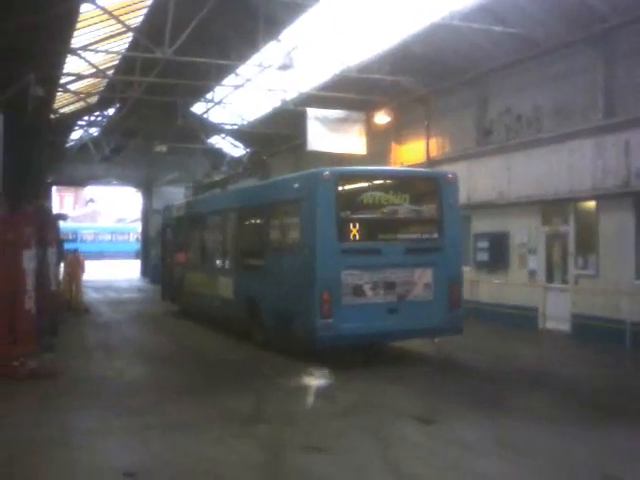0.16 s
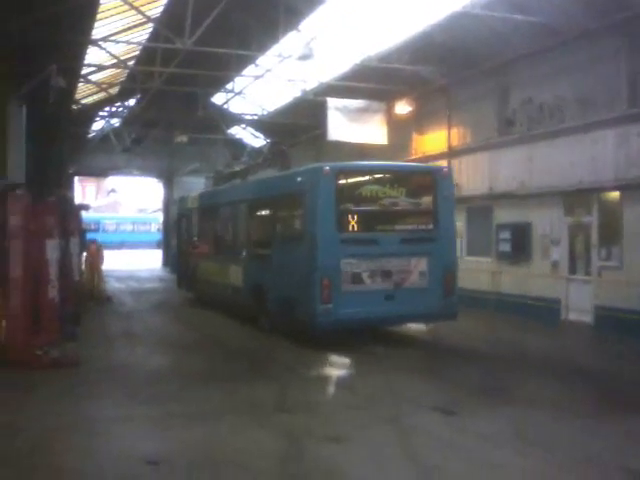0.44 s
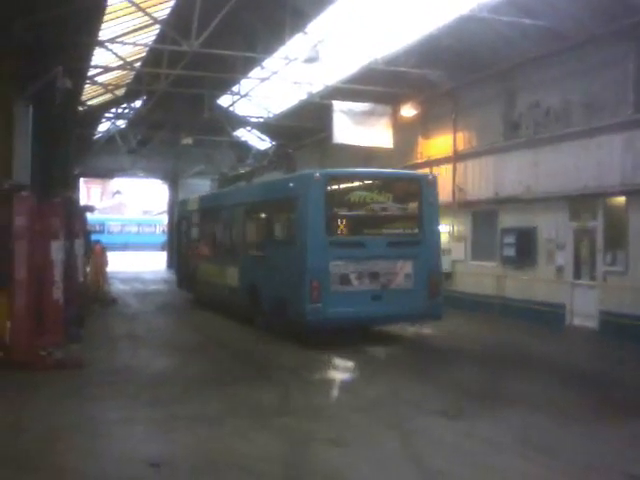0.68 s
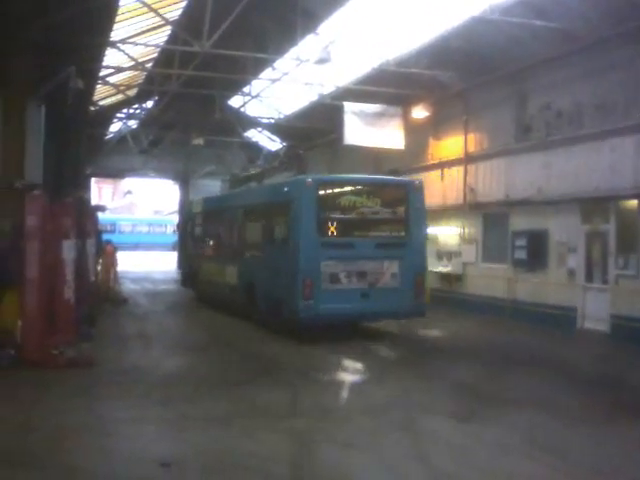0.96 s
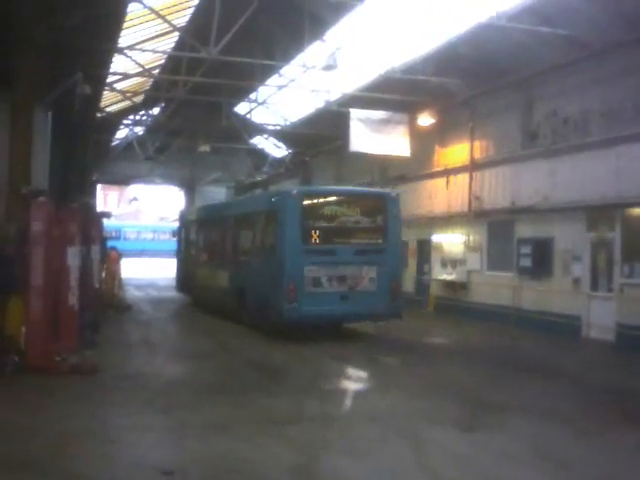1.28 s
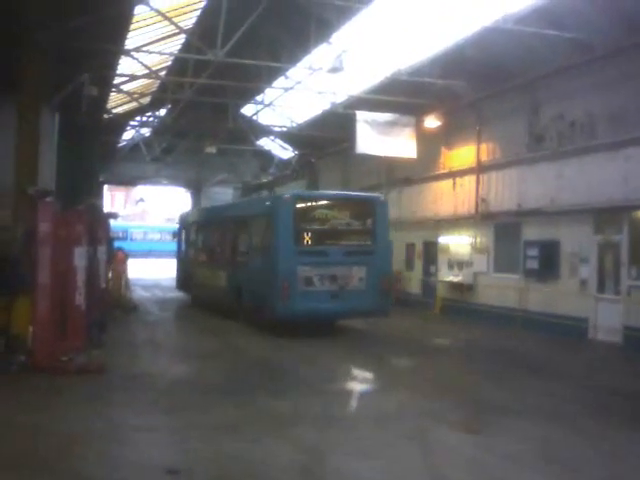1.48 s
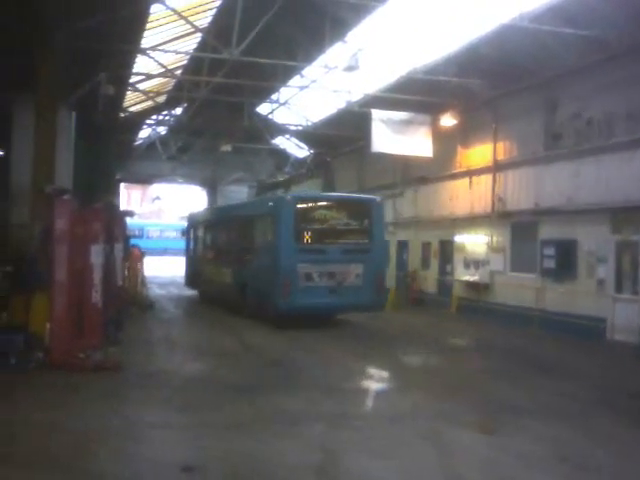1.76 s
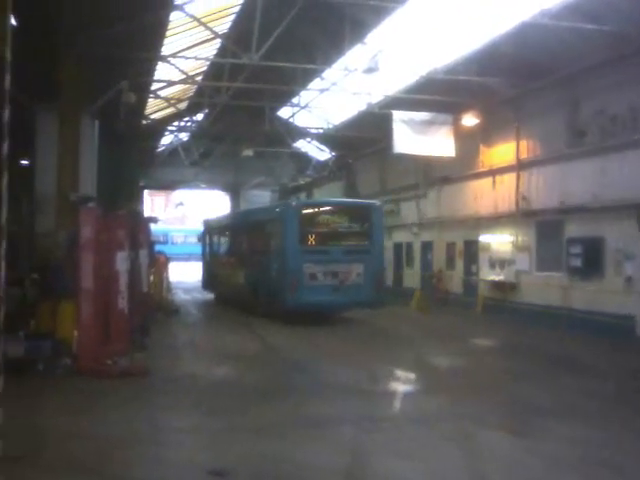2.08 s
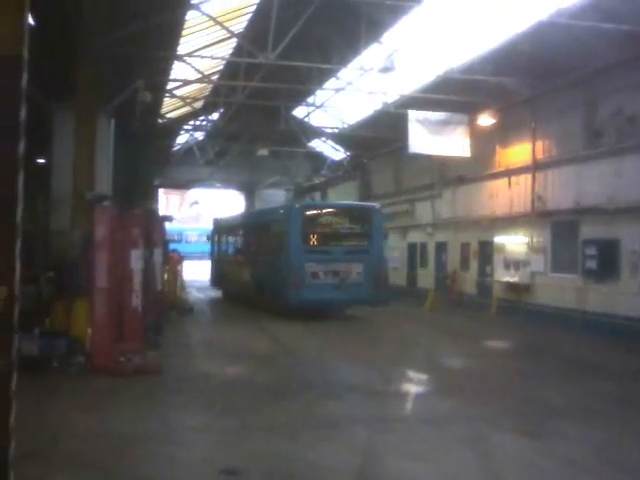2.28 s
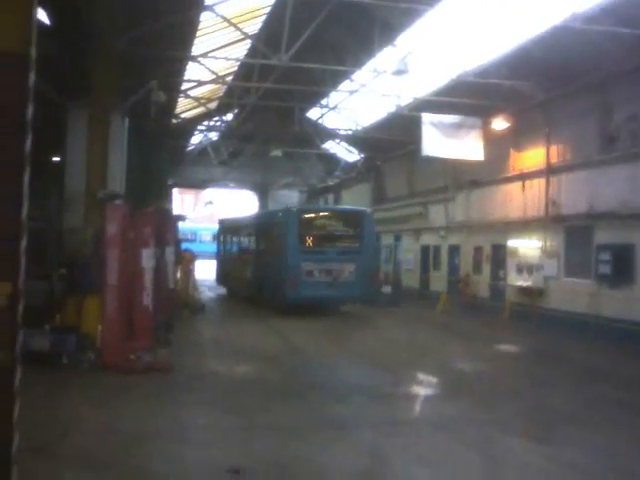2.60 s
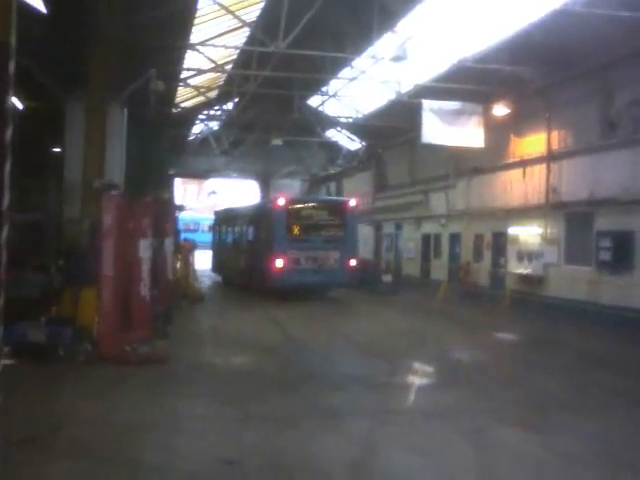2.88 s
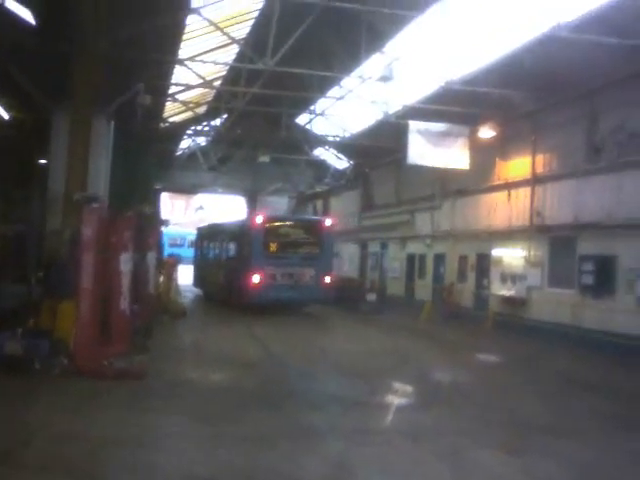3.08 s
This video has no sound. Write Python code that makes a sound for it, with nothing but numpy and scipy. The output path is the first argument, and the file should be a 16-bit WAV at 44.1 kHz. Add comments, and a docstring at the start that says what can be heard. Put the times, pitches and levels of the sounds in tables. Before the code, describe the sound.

A diesel bus engine, already running, roars and clatters in a reverberant depot. Its pitch climbs steadily from 0 to 1.8 s, with a low exhaust boom swelling near 1.35 s and faint gear whines around 1, 1.6 and 2 s. It peaks and changes up at 1.8 s, pitch sagging until 2.5 s, then levels and fades to 3.25 s over steady low hum. Gritty, low-quality camera sound.

```python
"""In a big, echoing depot a diesel bus pulls away: the engine climbs, changes up near 1.8 s and fades with distance.
A low hum and dull hall noise stay steady behind it, and gear whines come and go as narrow gliding tones.
The exhaust is tones tied to the firing rate over rumbling noise; the engine is noise bursts, one per firing,
mixed with fan rush and coloured by the block and its covers. The noise parts blur in the hall's echo.
A small camera samples it all at a low rate and holds each sample, which adds a gritty sheen."""
import sys
import numpy as np
from scipy import signal
from scipy.fft import rfft, irfft, next_fast_len
from scipy.io import wavfile
from scipy.ndimage import map_coordinates

SR = 44100
rng = np.random.default_rng(int(sys.argv[2]) if len(sys.argv) > 2 else 0)


def put_to_file(sound):
    """Save the sound as 16-bit audio at rate SR, in the file named by the first command-line argument."""
    columns = np.atleast_2d(sound).T  # one column per channel
    safe = np.clip(columns, -1, 1)
    whole_steps = np.round(safe * 32767)
    wavfile.write(sys.argv[1], SR, whole_steps.astype(np.int16))


N = 143325
T = np.arange(-SR, N) / SR  # time in s; the engine is already running a second earlier

# Engine speed: t/s, firing rate/Hz
FIRING_RATE = [(0, 65), (.5, 69.3), (1, 74), (1.45, 78), (1.8, 80), (2.1, 75.5), (2.5, 69), (2.9, 70.5),
               (3.25, 70.7)]
# Level of the engine block, before a small fixed lift: t/s, level/dB
BLOCK_LEVEL = [(0, -18), (.6, -17), (1.15, -17), (1.5, -18), (1.82, -15.5), (2.12, -20), (2.42, -18.5),
               (2.65, -22), (2.95, -24), (3.25, -25)]
# Level of the clatter from the covers, before a small wobble: t/s, level/dB
COVERS_LEVEL = [(0, -19.5), (.9, -19.5), (1.65, -17), (1.95, -19.5), (2.35, -21), (2.6, -25), (3.25, -28)]
# Level of the exhaust rumble: t/s, level/dB
RUMBLE_LEVEL = [(0, -25), (.5, -24.5), (1.1, -23), (1.8, -21.5), (2.15, -25), (2.45, -26), (2.8, -34.5),
                (3.25, -37)]
# Level of the firing note: t/s, level/dB
FIRING_LEVEL = [(0, -35), (.35, -36), (.9, -38), (1.35, -38), (1.55, -51), (2.4, -60), (3.25, -50)]
# Level of its octave, which booms as it passes 155 Hz, before a small wobble: t/s, level/dB
BOOM_LEVEL = [(0, -33.5), (.6, -38), (.9, -38), (1.05, -31.5), (1.35, -25.5), (1.55, -63.5), (2.1, -34),
              (2.6, -44), (3.25, -45)]
# Higher exhaust tones, before pipe, flutter and rumble level: multiple of the firing rate, level/dB
EXHAUST_ORDERS = [(1.5, -15), (2.5, -17), (3, -13), (3.5, -8.5), (4, -11), (4.5, -11.5), (5, -9), (5.5, -5),
                  (6, -4.5)]
# Whining tones of the block, against the block and before flutter: multiple of the firing rate, level/dB
WHINING_ORDERS = [(11.5, -24.5), (12, -19.5), (13, -15.5)]
# Colour of the exhaust pipe: f/Hz, level/dB
PIPE_COLOUR = [(20, -45), (58, -38), (82, -7), (105, -7), (165, 0), (205, -7.5), (245, -6), (305, 3.5),
               (345, -0.5), (420, -8), (520, -10), (800, -23.5), (2000, -78)]
# Colour of the engine block: f/Hz, level/dB
BLOCK_COLOUR = [(60, -60), (200, -38), (400, -8.5), (480, -4.5), (600, -1.5), (730, -4.5), (830, -1.5),
                (940, 0.5), (1100, -1.5), (1260, -6.5), (1450, -6.5), (2000, -9.5), (4000, -47)]
# Colour of the thin covers: f/Hz, level/dB
COVERS_COLOUR = [(100, -72), (700, -12.5), (1150, -6), (1400, -7), (1600, -2), (1750, -2), (1950, -4.5),
                 (2200, -11), (2500, -11.5), (2850, -14.5), (3150, -11.5), (3500, -16.5), (3950, -24)]
# Strength of each cylinder's knock, before random spread: level/dB
CYLINDER_LEVEL = [1.7, -1.3, 0.99, -0.62]
# Whines: t of peak/s, width/s, f at peak/Hz, glide/(Hz per s), level before wobble/dB; the first is the block's
# rising whine near 11.5 times the firing rate, the rest come from the gears
WHINES = [(.95, .22, 846, 105, -23), (1.57, .07, 1850, -60, -26), (2.02, .12, 1716, 60, -21.5),
          (2.45, .35, 947, 0, -26)]
# How long the hall rings, as the time to fall by 60 dB: f/Hz, t/s
HALL_RINGING = [(100, 2), (1000, 3.23), (4000, 1.43)]
# Colour of the hall's background noise: f/Hz, level/dB
AIR_COLOUR = [(20, -21), (55, -15), (75, -11), (100, -1), (130, -4), (195, 3.5), (260, -3.5), (450, -13),
              (2000, -24), (4000, -43)]

AIR_DB = -36  # level of the hall's background noise
HUM_HZ, HUM_DB = 35, -41.5  # the hum's level before a small wobble
KNOCK_S, KNOCK_SCATTER_DB = 0.0046, 1  # time for a knock to fall to 37 %; spread from one to the next
PIPE_GAS_DB = -4  # turbulence against the rumble level
FLUTTER_DB = 2.2  # scale of an order's swell and fade as the bus moves through the hall
ECHO_RENEW_S = 0.25  # a new echo pattern starts this often as the bus moves
RECORDER_HZ, TOP_HZ = 8000, 15500  # the camera's sampling rate; nothing is left from the top frequency up
CEILING = 0.95  # the camera rounds off peaks toward this size


def amp(db):
    """Turn decibels into a gain."""
    return 10 ** (np.asarray(db) / 20)


def unit(x):
    """Scale to an average (rms) strength of 1."""
    return x / np.sqrt(np.mean(x ** 2) + 1e-20)


def curve(rows):
    """Join (t/s, value) points with straight lines."""
    return np.interp(T, *np.transpose(rows))


def along(points, hz):
    """Join (f/Hz, value) points with straight lines on a log frequency axis."""
    f, value = np.transpose(points)
    return np.interp(np.log(hz + 1), np.log(f + 1), value)


def wobble(rate):
    """Draw a smooth random curve through `rate` random points a second."""
    points = rng.standard_normal(400)
    return map_coordinates(points, [(T - T[0]) * rate], mode="wrap")


def filtered(x, response):
    """Multiply each frequency of x by response(f/Hz)."""
    size = next_fast_len(len(x) + 8192)
    spectrum = rfft(x, size) * response(np.fft.rfftfreq(size, 1 / SR))
    return irfft(spectrum, size)[:len(x)]


def coloured(x, colour):
    """Pass x through a body that favours some frequencies, at rms 1."""
    return unit(filtered(x, lambda hz: amp(along(colour, hz))))


def echo_tail():
    """Make a second of noise that dies away at the hall's own speed for each frequency."""
    hz, t, noise = signal.stft(rng.standard_normal(SR), SR, nperseg=256)
    decay = amp(-60 * t / along(HALL_RINGING, hz)[:, None])
    return signal.istft(noise * decay, SR, nperseg=256)[1]


def depot(x, direct_db):
    """Add the hall's long echo, renewed as the bus moves, to the direct sound, at rms 1."""
    wet = np.zeros(len(x) + 2 * SR)
    hop = int(ECHO_RENEW_S * SR)
    fade = np.sin(np.linspace(0, np.pi, 2 * hop))  # neighbouring pieces overlap by half
    for start in range(0, len(x), hop):
        piece = x[start:start + 2 * hop]
        echo = signal.fftconvolve(piece * fade[:len(piece)], echo_tail())
        wet[start:start + len(echo)] += echo
    return unit(unit(wet[:len(x)]) + amp(direct_db) * unit(x))


def firings():
    """Count the firings so far, fractions included, by adding up the firing rate."""
    return np.cumsum(curve(FIRING_RATE)) / SR


def tone(multiple):
    """Make one order: a slightly unsteady sine at a multiple of the firing rate, at about rms 1."""
    phase = 2 * np.pi * multiple * firings()
    phase = phase + rng.uniform(0, 2 * np.pi) + 0.2 * wobble(8)
    return np.sqrt(2) * np.sin(phase)


def knocks(fan_db):
    """Make a dying noise burst at every firing, uneven among cylinders, over the fan's even rush."""
    turn = firings()
    number = turn.astype(int)
    size_db = np.take(CYLINDER_LEVEL, number, mode="wrap")
    size_db = size_db + KNOCK_SCATTER_DB * rng.standard_normal(400)[number]
    since_firing = (turn - number) / curve(FIRING_RATE)  # s
    burst = amp(size_db) * np.exp(-since_firing / KNOCK_S)
    fan = amp(fan_db) * rng.standard_normal(len(T))
    return unit(burst * rng.standard_normal(len(T))) + fan


def hum():
    """Make a low hum and the hall's dull noise, which stay when the bus leaves."""
    line = np.sqrt(2) * np.sin(2 * np.pi * HUM_HZ * T)
    air = coloured(rng.standard_normal(len(T)), AIR_COLOUR)
    return amp(HUM_DB + 0.71 * wobble(6.8)) * line + amp(AIR_DB) * air


def gears():
    """Make narrow, unsteady whines that swell and fade as the bus gathers speed and changes gear."""
    out = np.zeros(len(T))
    for peak_s, width_s, hz, glide, db in WHINES:
        pitch = hz + glide * (T - peak_s)
        phase = 2 * np.pi * np.cumsum(pitch) / SR + 0.6 * wobble(25)
        swell = np.exp(-((T - peak_s) / width_s) ** 2 / 2)
        out += amp(db + wobble(14)) * swell * np.sin(phase)
    return out


def exhaust():
    """Sweep orders of the firing rate through the pipe's resonances, over its turbulent rumble."""
    low = amp(curve(FIRING_LEVEL)) * tone(1)
    low = low + amp(curve(BOOM_LEVEL) + 1.5 * wobble(6.28)) * tone(2)
    orders = np.zeros(len(T))
    for multiple, db in EXHAUST_ORDERS:
        pipe_db = along(PIPE_COLOUR, multiple * curve(FIRING_RATE))
        orders += amp(db + pipe_db + FLUTTER_DB * wobble(3.904)) * tone(multiple)
    gas = depot(coloured(knocks(fan_db=-0.5), PIPE_COLOUR), direct_db=-12)
    return low + amp(curve(RUMBLE_LEVEL)) * (orders + amp(PIPE_GAS_DB) * gas)


def engine():
    """Let combustion ring the block near 900 Hz and the thin covers near 1700 Hz."""
    block = depot(coloured(knocks(fan_db=-4.5), BLOCK_COLOUR), direct_db=-6.5)
    for multiple, db in WHINING_ORDERS:
        block = block + amp(db + FLUTTER_DB * wobble(6.2)) * tone(multiple)
    covers = depot(coloured(knocks(fan_db=-1.5), COVERS_COLOUR), direct_db=-10.5)
    covers = covers * amp(curve(COVERS_LEVEL) + 0.45 * wobble(23))
    return block * amp(curve(BLOCK_LEVEL) + 0.5) + covers


def scene():
    """Add the hum and the bus, heard from one spot, leaving out the second before the start."""
    return (hum() + gears() + exhaust() + engine())[None, -N:]


def record(dry):
    """Sample at a low rate and hold each value, as the camera does, mirroring the roar into the treble."""
    slow = signal.resample_poly(dry[0], RECORDER_HZ, SR)
    slow = slow / (1 + (slow / CEILING) ** 8) ** (1 / 8)  # peaks are rounded off
    held = slow[np.arange(N) * RECORDER_HZ // SR]
    return filtered(held, lambda hz: hz < TOP_HZ)[None]


dry = scene()
out = record(dry)
put_to_file(out)
```